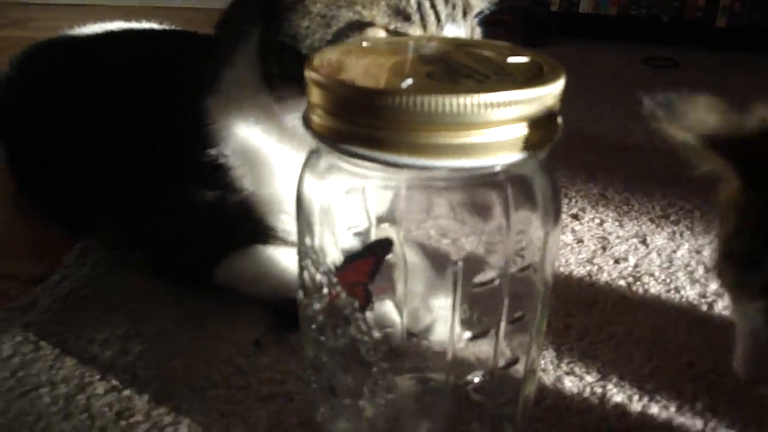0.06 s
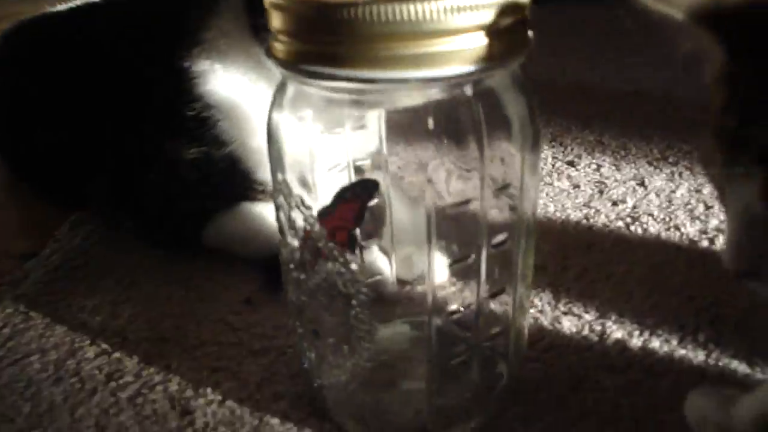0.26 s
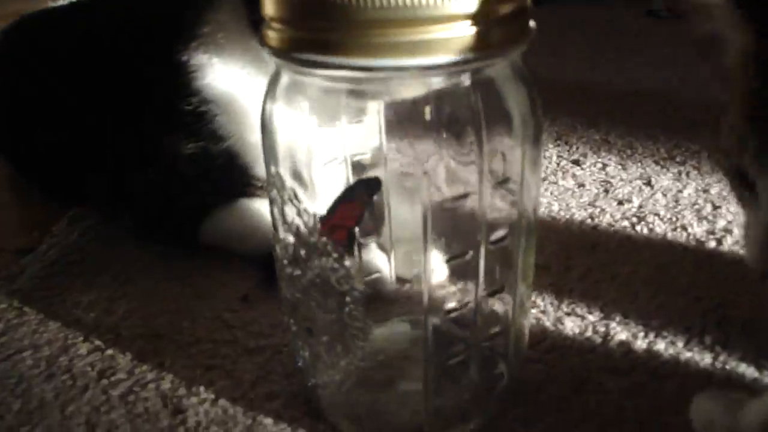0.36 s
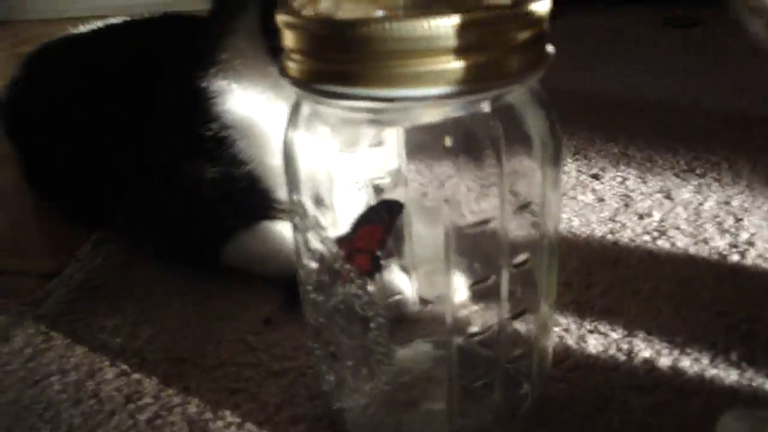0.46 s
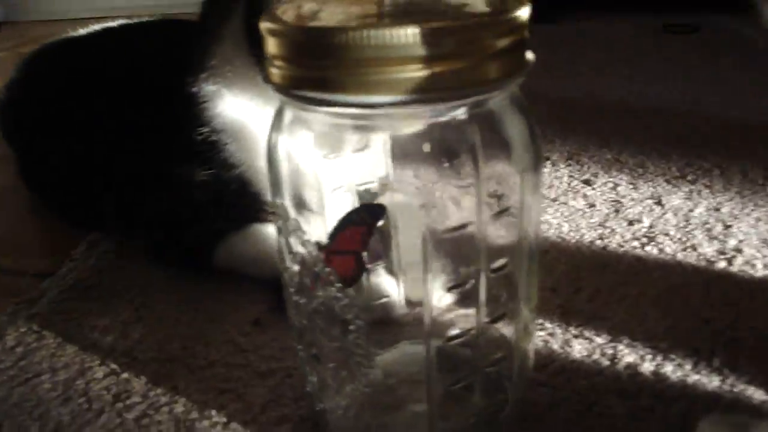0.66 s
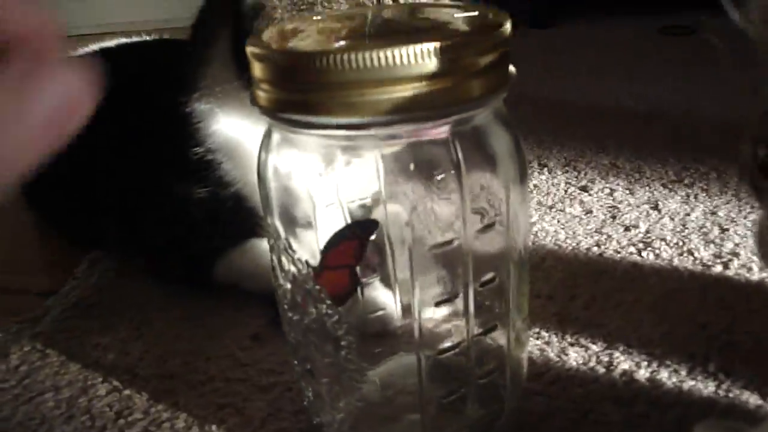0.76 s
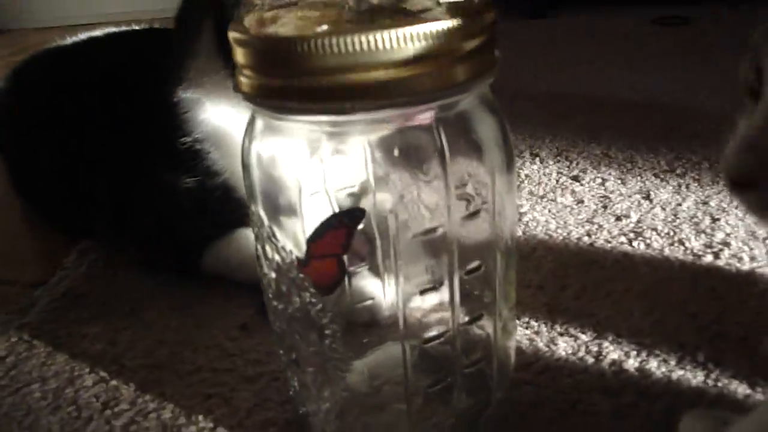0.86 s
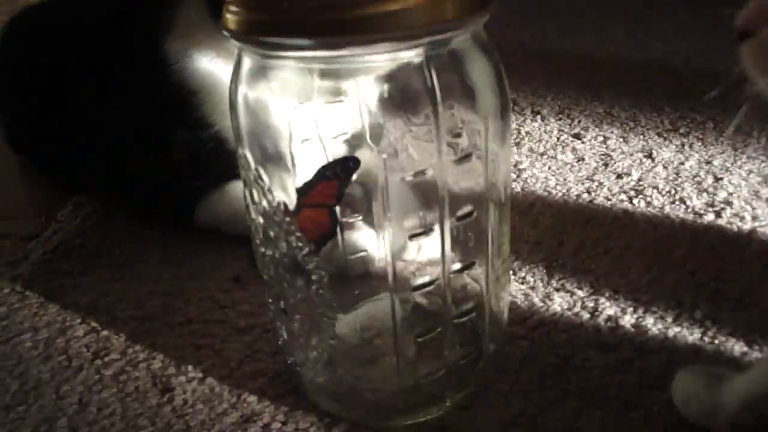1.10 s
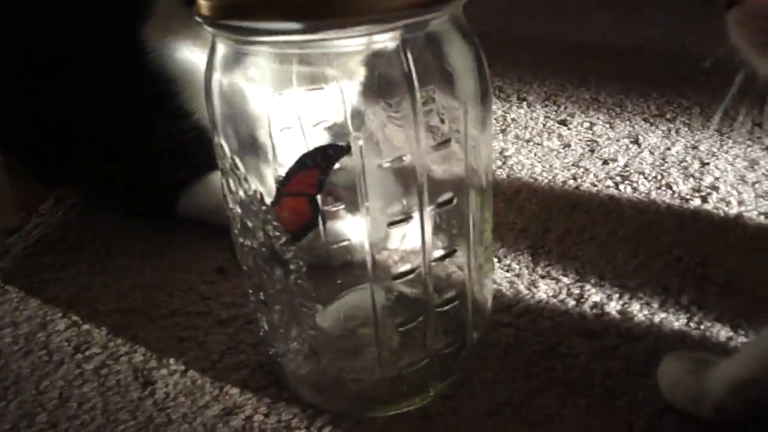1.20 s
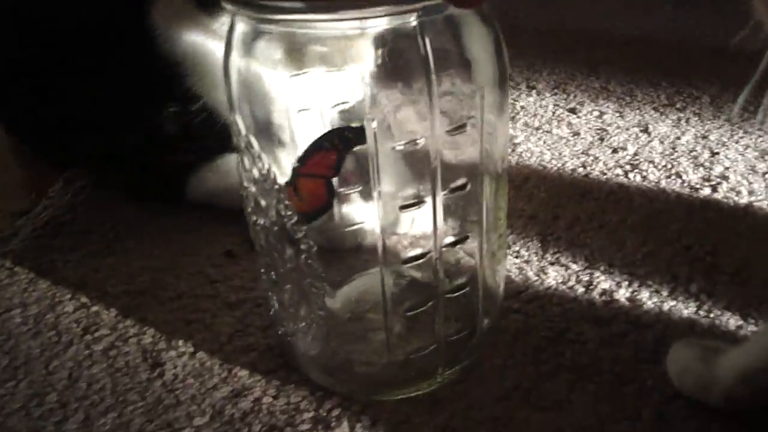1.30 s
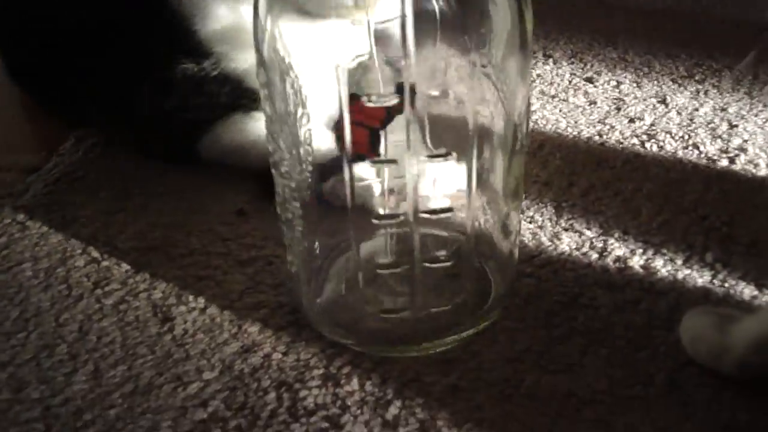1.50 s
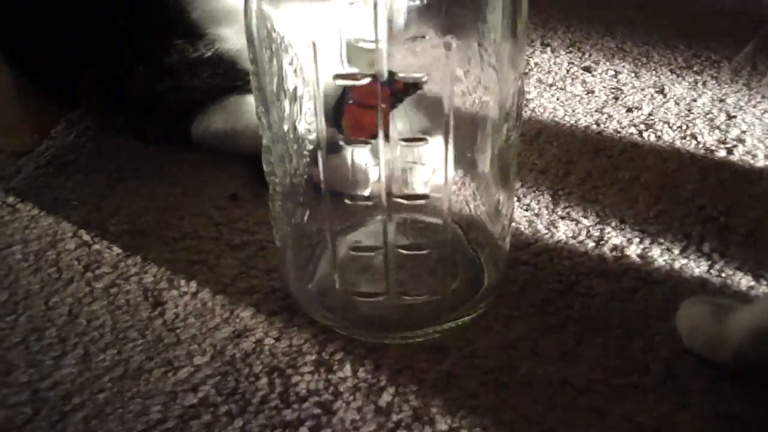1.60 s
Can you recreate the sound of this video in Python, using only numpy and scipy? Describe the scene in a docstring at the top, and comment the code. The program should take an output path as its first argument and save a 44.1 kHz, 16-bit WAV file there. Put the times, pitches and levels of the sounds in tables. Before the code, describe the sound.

One sharp tap on a glass jar, then faint knocks and rustles over soft hiss.

```python
"""A quiet carpeted room, the microphone close to a lidded glass jar.
From the start there is a steady hiss, thin electrical ticking in the treble and a faint rub and rustle.
At 0.15 s comes one sharp, dry tap: a crack, a short ring of glass and lid, barely any room.
Then things move around the jar: soft handling knocks, a brushing stroke at 0.6 s and, from 1.2 s,
light slides, thin scrapes and more rustling."""
import sys
import numpy as np
from scipy import signal
from scipy.fft import rfft, irfft
from scipy.io import wavfile

SR = 44100
rng = np.random.default_rng(int(sys.argv[2]) if len(sys.argv) > 2 else 0)


def dump(signal):
    """Clip the signal to [-1, 1] and save it as 16-bit WAV at the path in sys.argv[1]."""
    limited = np.clip(np.atleast_2d(signal).T, -1, 1)
    pcm = np.round(limited * 32767).astype(np.int16)
    wavfile.write(sys.argv[1], SR, pcm)


N = 72765
T = np.arange(N) / SR


def from_db(db):
    """Decibels to gain."""
    return 10 ** (np.asarray(db) / 20)


def rms_one(x):
    """Scale to rms 1."""
    return x / np.sqrt(np.mean(x ** 2) + 1e-20)


def noise(colour):
    """Noise of rms 1 shaped by (frequency [Hz], relative level [dB]), fading below the lowest point."""
    hz, db = np.transpose(colour)
    freqs = np.maximum(np.fft.rfftfreq(N, 1 / SR), 1)
    gain = from_db(np.interp(np.log(freqs), np.log(hz), db)) * np.minimum(freqs / hz[0], 1)
    return rms_one(irfft(rfft(rng.standard_normal(N)) * gain, N))


def decay(start, t60):
    """Jumps to 1 at the start, then falls 60 dB every t60 seconds."""
    return (T >= start) * np.exp(-np.log(1000) * np.maximum(T - start, 0) / t60)


def ring(start, hz, t60):
    """One struck mode: a dying sine."""
    return decay(start, t60) * np.sin(2 * np.pi * hz * (T - start))


def friction(strokes, colour):
    """Surfaces rubbing: grainy noise that swells and fades in a bell curve with each stroke."""
    grain_db, grains_per_s = 1.5, 500
    swell = sum(from_db(db) * np.exp(-.5 * ((T - peak) / np.where(T < peak, rise, fall)) ** 2)
                for peak, rise, fall, db in strokes)
    grain = np.interp(T * grains_per_s, np.arange(N), rng.standard_normal(N))
    return swell * rms_one(from_db(grain_db * grain) * noise(colour))


def hiss():
    """The steady noise floor, strongest in the low mids."""
    # hiss spectrum: (frequency [Hz], relative level [dB])
    colour = [(15, -58), (25, -26), (186, -5.5), (361, -2.5), (490, -5.5), (903, -5), (1050, -10),
              (1160, -7.5), (1260, -9.5), (1500, -9.5), (2040, -11.5), (5780, -18), (9370, -18),
              (10900, -26), (14200, -58), (22000, -120)]
    return from_db(-54.5) * noise(colour)


def mains_buzz():
    """Electrical ticking: one tiny high ping of uneven strength in every mains cycle."""
    mains_hz, level_db, spread_db = 60, -48.5, 2
    starts = np.arange(0, N / SR, 1 / mains_hz)
    clicks = np.zeros(N)
    clicks[(starts * SR).astype(int)] = from_db(level_db + spread_db * rng.standard_normal(len(starts)))
    return signal.fftconvolve(clicks, ring(0, hz=9350, t60=.004))[:N]


def rubs():
    """Dull friction with little treble."""
    # rubbing strokes: (peak time [s], rise [s], fall [s], level [dB])
    strokes = [(.02, .05, .06, -56), (.545, .02, .012, -61), (.652, .013, .013, -53)]
    # rub spectrum: (frequency [Hz], relative level [dB])
    colour = [(120, -17), (350, -3), (700, -4), (950, 1.5), (1500, -6), (4000, -18), (11000, -27)]
    return friction(strokes, colour)


def ticks():
    """Now and then the electrical ticking gives a stronger, broader click: a burst of bright noise."""
    # electrical clicks: (time [s], level [dB])
    clicks = [(.0490, -50), (.0660, -47), (.0825, -51), (.5160, -40), (.5326, -39.5), (.7832, -50),
              (.7997, -51), (.9832, -46), (1.0500, -48.5), (1.1500, -48)]
    # click spectrum: (frequency [Hz], relative level [dB])
    colour = [(1500, -20), (4500, -8), (5800, 0.5), (8000, -2), (10000, -4), (11000, -13)]
    return sum(from_db(db) * decay(start, t60=.009) for start, db in clicks) * noise(colour)


def rustles():
    """Soft, slow swells of friction, strongest near 2 kHz."""
    # rustling movements: (peak time [s], rise [s], fall [s], level [dB])
    strokes = [(.05, .06, .04, -59.5), (.47, .07, .05, -62), (1.42, .07, .1, -56), (1.63, .07, .06, -59)]
    # rustle spectrum: (frequency [Hz], relative level [dB])
    colour = [(300, -18), (1000, -6), (2000, 2), (3500, -3), (6000, -3), (8000, -14.5), (11000, -17)]
    return friction(strokes, colour)


def tap():
    """The struck jar cracks, rings and thumps; nearby surfaces and a trace of room answer."""
    # broad resonances of the first crack: (frequency [Hz], relative level [dB], t60 [s])
    crack_modes = [(1452, -4.7, .0041), (4467, .8, .0033), (6322, -3.5, .0036), (8980, .6, .0023)]
    # short ring of jar and lid: (frequency [Hz], relative level [dB], t60 [s])
    jar_modes = [(1377, -21.5, .0236), (1889, -24, .034), (2148, -7.6, .0134), (2689, -16.3, .0206),
                 (3135, -14, .0133), (3913, -14.6, .0144), (4315, -21.3, .0096), (5853, -16, .0122),
                 (6190, -21.3, .018), (7090, -22.7, .022), (7560, -24.5, .027), (8000, -24.8, .029),
                 (9020, -25.3, .026), (10069, -33.4, .023)]
    # dull thump of the jar's mass: (frequency [Hz], relative level [dB], t60 [s])
    thump_modes = [(75, -47, .09), (380, -31, .01)]
    # spectrum of the reflections: (frequency [Hz], relative level [dB])
    scatter_colour = [(300, -15.5), (900, -14), (1300, -2), (2000, 1), (3500, -2.5), (5000, -10),
                      (7500, -5.5), (9200, -5.5), (11000, -13)]
    start, ring_lag_s, scatter_rise_s = .148, .00033, .002
    crack = sum((-1) ** k * from_db(db) * ring(start, hz, t60)
                for k, (hz, db, t60) in enumerate(crack_modes))
    body = sum(from_db(db) * ring(start + ring_lag_s, hz, t60) for hz, db, t60 in jar_modes)
    thump = sum(from_db(db) * ring(start, hz, t60) for hz, db, t60 in thump_modes)
    low_cut = signal.butter(6, 1010, "high", fs=SR, output="sos")  # the jar radiates little bass
    direct = from_db(-10) * (signal.sosfilt(low_cut, crack + body + 1e-18) + thump)
    scatter = from_db(-32) * decay(start, t60=.029)
    room = from_db(-56) * decay(start, t60=.12)
    onset = np.clip((T - start) / scatter_rise_s, 0, 1)
    return direct + (scatter + room) * onset * noise(scatter_colour)


def knocks():
    """Soft handling knocks: each touches twice, and a softer contact loses more treble."""
    # knocks around the jar: (time [s], level [dB], treble cutoff [Hz])
    contacts = [(.1875, -49, 700), (.3525, -43, 3400), (.3615, -45, 500), (.4025, -37, 1500),
                (.5000, -43.5, 3800), (.7285, -42, 4000), (.8725, -47, 1200), (.9605, -44.5, 1400),
                (.9675, -48.5, 1300), (1.2735, -47, 1500), (1.3255, -48, 2500)]
    # what the knocks ring with: (frequency [Hz], relative level [dB], t60 [s])
    modes = [(335, -9, .045), (460, -11, .022), (820, -8, .017), (1120, -6, .019), (1400, -5, .017),
             (1850, -4, .016), (2330, -5.5, .014), (2720, -4, .014), (3150, -3.5, .014), (4200, -10, .01)]
    rebound_s, rebound_db = .0028, -3.5
    out = np.zeros(N)
    for start, db, cutoff_hz in contacts:
        softening = signal.butter(2, cutoff_hz, fs=SR, output="sos")
        for lag, touch_db in ((0, 0), (rebound_s * rng.uniform(.8, 1.2), rebound_db)):
            ringing = sum((-1) ** k * from_db(mode_db + rng.normal(0, 1.5)) * ring(start + lag, hz, t60)
                          for k, (hz, mode_db, t60) in enumerate(modes))
            out += from_db(db + touch_db) * signal.sosfilt(softening, ringing + 1e-18)
    return out


def brush():
    """One brushing stroke of broadband friction."""
    # brush spectrum: (frequency [Hz], relative level [dB])
    colour = [(150, -24), (450, -2.5), (650, -5), (900, 1.5), (2100, .5), (3300, -5), (5000, -9),
              (8500, -7.5), (11000, -12)]
    peak_s, rise_s, fall_s, level_db = .606, .031, .029, -46.2
    return friction([(peak_s, rise_s, fall_s, level_db)], colour)


def slides():
    """Light sliding friction that hisses near 8 kHz."""
    # sliding strokes: (peak time [s], rise [s], fall [s], level [dB])
    strokes = [(1.226, .008, .022, -59), (1.293, .03, .013, -54), (1.61, .06, .07, -58)]
    # slide spectrum: (frequency [Hz], relative level [dB])
    colour = [(2000, -15), (3800, -12), (4700, -7), (5600, -11), (7600, -10), (8200, 1), (8700, -7),
              (9600, -5), (11000, -12.5)]
    return friction(strokes, colour)


def scrapes():
    """Thin scraping: friction in one narrow resonance near 4.7 kHz."""
    # scraping strokes: (peak time [s], rise [s], fall [s], level [dB])
    strokes = [(1.285, .03, .02, -61), (1.615, .045, .05, -57)]
    # scrape spectrum: (frequency [Hz], relative level [dB])
    colour = [(3500, -25), (4350, -12), (4720, 0), (5150, -12), (6500, -26)]
    return friction(strokes, colour)


def scene():
    """Background, tap and the movement around the jar, all at one microphone."""
    background = hiss() + mains_buzz() + ticks()
    movement = rubs() + rustles() + knocks() + brush() + slides() + scrapes()
    return (background + tap() + movement)[None]


def record(dry):
    """The microphone chain cuts the top steeply above 11 kHz."""
    high_cut = signal.ellip(10, .2, 70, 11000, fs=SR, output="sos")
    return signal.sosfilt(high_cut, dry)


dry = scene()
out = record(dry)
dump(out)
```